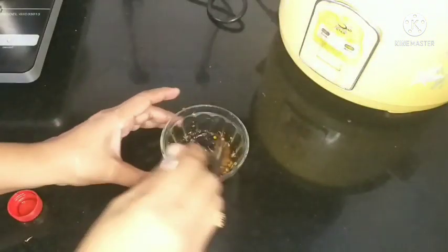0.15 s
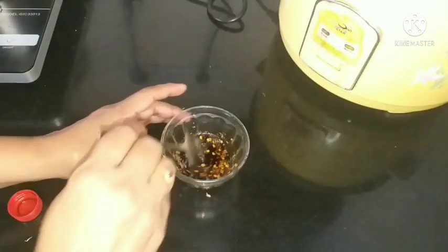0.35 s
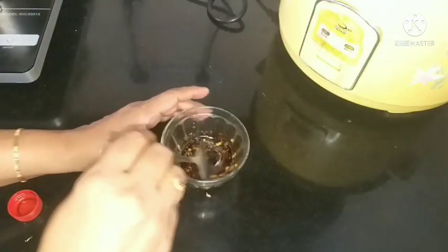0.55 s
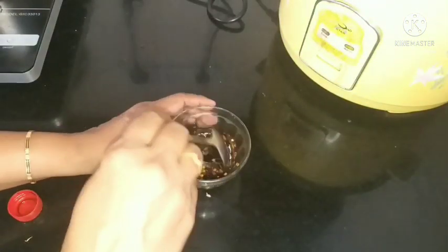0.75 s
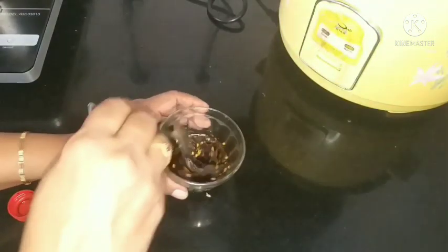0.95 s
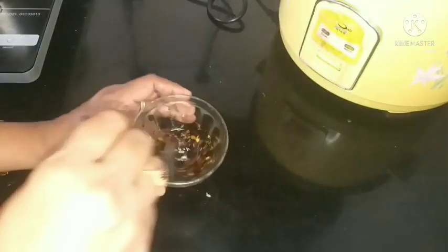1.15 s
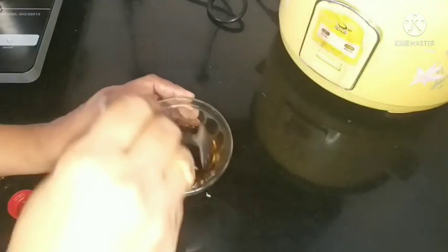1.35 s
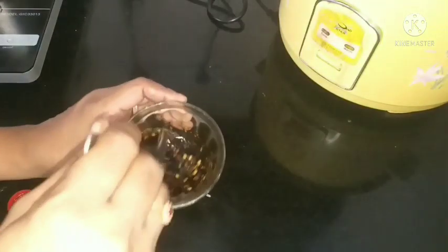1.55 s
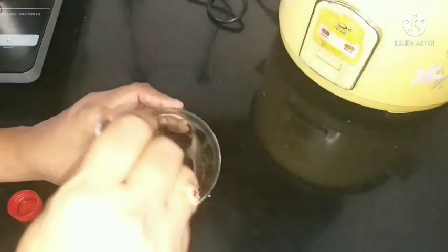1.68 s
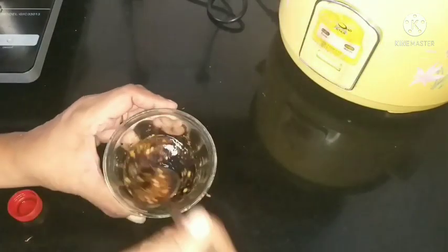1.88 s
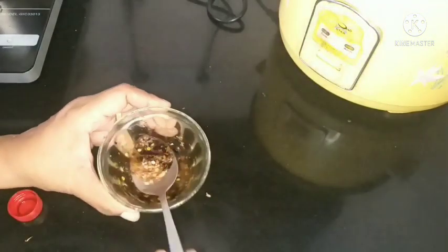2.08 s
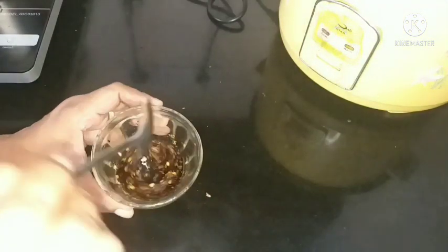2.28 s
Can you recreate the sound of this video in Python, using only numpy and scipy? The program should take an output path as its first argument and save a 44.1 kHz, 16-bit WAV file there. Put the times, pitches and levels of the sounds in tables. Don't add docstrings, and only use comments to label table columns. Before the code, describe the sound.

A metal spoon stirs runny sauce in a small glass bowl, close to a phone in a hard kitchen with low hum. Light scrapes and ticks lead to a loud ringing clink at 0.23 s, a knock at 0.36 and a softer clink at 0.59. Scrapes and damped knocks follow, strongest at 1.25; a swipe at 1.75, then hard clinks at 1.87 and 2.02, fading into quiet.

```python
import sys
import numpy as np
from scipy import signal
from scipy.fft import rfft, irfft, next_fast_len
from scipy.io import wavfile
from scipy.ndimage import uniform_filter1d, map_coordinates

SR = 44100
rng = np.random.default_rng(int(sys.argv[2]) if len(sys.argv) > 2 else 0)


def file_out(sig):
    cols = np.atleast_2d(sig).T
    lim = np.clip(cols, -1, 1)
    pcm = np.round(lim * 32767).astype(np.int16)
    wavfile.write(sys.argv[1], SR, pcm)


def volts_from_decibels(level):
    exponent = np.asarray(level, float) / 20
    return 10 ** exponent


N = 103635
LOWEST_HZ = 835


def unit(x):
    return x / np.sqrt(np.mean(x ** 2) + 1e-20)


def along(points, hz):
    f, v = np.transpose(points)
    return np.interp(np.log(hz + 1), np.log(f + 1), v)


def wobble(rate_hz, size=N):
    knots = rng.standard_normal(int(size * rate_hz / SR) + 4)
    return map_coordinates(knots, [np.arange(size) * rate_hz / SR])


def filtered(x, response):
    m = next_fast_len(x.shape[-1] + 8192)
    spectrum = rfft(x, m) * response(np.fft.rfftfreq(m, 1 / SR))
    return irfft(spectrum, m)[..., :x.shape[-1]]


def shaped(x, points):
    return filtered(x, lambda f: volts_from_decibels(along(points, f)))


def above(low_hz):
    return lambda f: (-f * f / (low_hz ** 2 - f * f + 1.3j * f * low_hz)) ** 3


def resonances(peaks):
    def response(f):
        total = 0
        for k, (centre_hz, width_hz, db) in enumerate(peaks):
            damping = 1j * f * width_hz
            total = total + (-1) ** k * volts_from_decibels(db) * damping / (centre_hz * centre_hz - f * f + damping)
        return total
    return response


def ring(modes, lift_db, longer, t, slosh_db=0):
    hz, db, t60_s = np.transpose(modes)[:, :, None]
    shake = 0
    if slosh_db:
        shake = np.array([wobble(70, size=len(t)) for _ in hz])
    decay_db = 60 * t / np.clip(t60_s * longer, .01, .6)
    level_db = db + lift_db[:, None] + slosh_db * shake - decay_db
    x = (volts_from_decibels(level_db) * np.sin(2 * np.pi * hz * t)).sum(0)
    return x / abs(x).max()


# frequency in Hz, level in dB per Hz.
HUM_SPECTRUM = [(24, -48.5), (40, -11), (209, -5), (363, -7), (751, -12.5), (1180, -17), (4000, -39.5),
                (16000, -51)]


def hum():
    level_db = -51 + 0.73 * wobble(6.85)
    return volts_from_decibels(level_db) * unit(shaped(rng.standard_normal(N), HUM_SPECTRUM))


# frequency in Hz, t60 in seconds.
KITCHEN_T60 = [(500, 0.48), (2000, 0.37), (6000, 0.33), (12000, 0.29)]


def kitchen(x):
    room_db, delay_s = -8, 0.0054
    hz, t, z = signal.stft(rng.standard_normal(SR // 2), SR, nperseg=256)
    fade = volts_from_decibels(-60 * t / along(KITCHEN_T60, hz)[:, None])
    tail = signal.istft(z * fade, SR, nperseg=256)[1]
    tail = np.pad(tail / np.linalg.norm(tail), (round(delay_s * SR), 0))
    return x + volts_from_decibels(room_db) * signal.fftconvolve(x, tail)[:len(x)]


# centre in Hz, width in Hz, level in dB.
RASP_PEAKS = [(1080, 400, -9.5), (1740, 34, 7), (2480, 360, -13.5), (2770, 49, -3.5), (2950, 48, -23),
              (3550, 45, -0.5), (4260, 91, -15.5), (4630, 150, -12), (5330, 90, -22.5), (6170, 30, -13),
              (7360, 100, -8.5), (9460, 430, -22), (10300, 110, -16), (13800, 300, -24)]


def rasp(grit):
    drift_share, flicker_db, shifts_per_s = .008, 5, 14
    hz, t, z = signal.stft(grit, SR, nperseg=1024)
    knots = rng.standard_normal((2, len(RASP_PEAKS), int(N / SR * shifts_per_s) + 2))
    drift, flicker = [[np.interp(t * shifts_per_s, np.arange(len(k)), k) for k in rows] for rows in knots]
    peaks = []
    for (centre_hz, width_hz, db), d, g in zip(RASP_PEAKS, drift, flicker):
        peaks.append((centre_hz * (1 + drift_share * d), width_hz, db + flicker_db * g))
    return signal.istft(z * resonances(peaks)(hz[:, None]), SR, nperseg=1024)[1][:N]


# frequency in Hz, level in dB per Hz.
BED_SPECTRUM = [(410, -53), (700, -27.5), (1700, 22.5), (2200, 2.5), (2770, 13), (8210, -25.5),
                (13900, -33.5), (16000, -43)]
# centre in Hz, width in Hz, level in dB.
BOTTOM_PEAKS = [(932, 19, 5.5), (1068, 52, 4)]
# time in seconds, pressure in dB, brightness in dB per octave,
# share of the bottom modes in dB.
BOTTOM_STROKES = [(.06, -79, 1, -12), (.097, -51.5, 5, 9), (0.124, -65.5, 6.5, 7), (.19, -53.5, 5, 9.5),
                  (.39, -56, -5, -6.5), (.5, -44, 2, 6.5), (.55, -55.5, -1, 5), (.58, -54.5, -11, -10),
                  (.79, -48.5, 0.5, -1.5), (.86, -44.5, -7.5, 0), (.93, -39, 2, -22), (1.03, -67, -0.5, -6),
                  (1.085, -41, 3, -20), (1.14, -65, -3, -23), (1.328, -45, 1.5, -14.5), (1.45, -50, 5.5, 1),
                  (1.541, -46.5, 2.5, 6), (1.63, -73.5, -7.5, -7.5)]
WALL_SWIPE = [
    (1.715, -80, 5.2, -13),
    (1.733, -41.5, 1.6, -22),
    (1.765, -39, 1.7, -21),
    (1.8, -50, 2.4, -19),
    (1.87, -72.5, 3.8, -23.5),
]


def scrape(strokes, low_hz):
    grit_per_s, grit_db, bed_db, fizz_db, fizz_hz = 3200, 0.5, 2, -13, 4500
    patchy_db, judder_db, judder_hz = 3, 1.8, 39.95
    s, pressure_db, tilt_db, bottom_db = np.transpose(strokes)
    time_s = np.arange(N) / SR

    grains = (rng.random(N) < grit_per_s / SR) * rng.standard_normal(N)
    grains = grains * volts_from_decibels(grit_db * rng.exponential(size=N))
    grit = unit(grains) + rng.standard_normal(N)

    tone = unit(rasp(grit))
    tone = tone + volts_from_decibels(fizz_db) * unit(filtered(grit, above(fizz_hz)))
    tone = tone + volts_from_decibels(bed_db) * unit(shaped(grit, BED_SPECTRUM))
    bottom = unit(filtered(grit, resonances(BOTTOM_PEAKS)))
    tone = tone + volts_from_decibels(np.interp(time_s, s, bottom_db)) * bottom

    hz, t, z = signal.stft(filtered(tone, above(low_hz)), SR, nperseg=512)
    patches = uniform_filter1d(uniform_filter1d(rng.standard_normal(z.shape), 5, 0), 8, 1)
    bright_db = np.outer(np.log2((hz + 300) / 3000), np.interp(t, s, tilt_db))
    z = z * volts_from_decibels(patchy_db * unit(patches) + bright_db)
    tone = signal.istft(z, SR, nperseg=512)[1][:N]
    level_db = np.interp(time_s, s, pressure_db) + judder_db * wobble(judder_hz)
    return kitchen(tone * volts_from_decibels(level_db))


# middle in seconds, peak in dB, pitch in Hz, length in seconds.
SLIP_EVENTS = [(0.099, -45, 1740, .04), (0.097, -46.5, 2730, 0.023), (0.099, -44.5, 3596, 0.025),
               (0.186, -36.5, 1030, 0.034), (0.174, -36, 3460, .025), (.175, -56, 11900, .02),
               (1.4693, -25, 4050, 0.0085), (0.504, -42, 2950, 0.028), (0.78, -33, 2950, 0.021),
               (0.938, -37, 2600, .035), (1.072, -36.5, 2750, 0.03), (1.388, -62, 10300, .06),
               (1.519, -45.5, 11000, 0.049), (1.751, -48.5, 2950, 0.041), (1.751, -49, 5560, 0.035),
               (2.348, -61, 10500, 0.013)]


def slips():
    width_share, rise_share = .035, .012
    out, t = np.zeros(N), np.arange(N) / SR
    for s, db, hz, length_s in SLIP_EVENTS:
        u = np.clip((t - s) / length_s, -3, 3)
        phase = 2 * np.pi * np.cumsum(hz * (1 + rise_share * u)) / SR
        band = wobble(width_share * hz) * np.cos(phase)
        band = band + wobble(width_share * hz) * np.sin(phase)
        out += volts_from_decibels(db) * np.exp(-4 * u ** 2) * band
    return kitchen(out)


# frequency in Hz, level in dB, t60 in seconds.
SPOON_MODES = [(946, -10.5, 0.035), (1096, -4.5, 0.034), (1500, -6.5, 0.037), (1751, -3, 0.085),
               (2423, -11, 0.02), (2750, 0, 0.027), (2950, -8.5, 0.046), (3450, -5.5, 0.079),
               (4032, 12, 0.015), (4580, -3.5, 0.027), (5390, 5, 0.014), (5940, 3, 0.0083),
               (7240, -0.5, 0.018), (10300, -8.5, 0.09)]
# frequency in Hz, level in dB per Hz.
CRACK_SPECTRUM = [(700, -1), (1500, -1.5), (3000, 0.5), (6000, -2.5), (8500, -11.5), (11000, -6),
                  (15500, -16), (17000, -33.5)]
# start in seconds, peak in dB, loudest frequency in Hz,
# brightness in dB per octave, chatter length in seconds.
WALL_KNOCKS = [(.1666, -29, 3450, 13, 0.0044), (0.172, -27, 3450, 1, 0.0086),
               (.18, -24, 2600, -1.5, 0.0068), (0.192, -24.5, 2600, 0, 0.0074), (.229, -3, 3330, 3, 0.002),
               (0.2322, -4.5, 3700, -3, 0.013), (0.352, -30, 2480, 5, 0.0071),
               (.360, -7.5, 2700, -5, 0.013), (0.592, -10.5, 1980, -9.5, 0.024),
               (0.7613, -17.5, 2600, -4.5, 0.012), (0.883, -14.5, 1730, -4.5, 0.0058),
               (0.888, -12.5, 2560, -8, 0.0051), (0.895, -21, 2300, -6.5, .005),
               (.94, -33, 1600, -6.5, 0.0061), (0.915, -45, 1630, -4, 0.026),
               (0.99, -27, 2500, -3.5, 0.0042), (1.056, -23, 2780, -4, 0.024), (1.153, -15, 6100, 1, 0.024),
               (1.25, -5, 2700, -3.5, 0.0048), (1.255, -16.5, 4400, -1.5, 0.012),
               (1.321, -25, 2900, -4, .006), (1.397, -27.5, 4600, 1.5, 0.012),
               (1.465, -22.5, 1700, -8, 0.0056), (1.467, -22, 6080, 2, 0.011),
               (1.4952, -16, 5420, -1.5, 0.0072), (1.733, -37.5, 3500, -4, 0.0092),
               (1.755, -31.5, 4300, -0.5, 0.0048), (1.83, -18, 1500, -0.5, 0.012),
               (1.8743, -7, 1500, -5, 0.013), (1.878, -9.5, 1104, -1.5, 0.028),
               (1.889, -11, 3000, -0.5, 0.015), (1.896, -12, 1700, -1.5, 0.018),
               (2.019, -6, 4640, 5.5, 0.0045), (2.023, -8, 4160, 5.5, 0.015), (2.04, -19, 4180, 1.5, 0.016),
               (0.759, -19.5, 1000, -9, .012), (.417, -37, 13500, 5, .008)]


def knocks():
    crack_t60_s, crack_db, scatter_db = 0.0053, 2.5, 1
    chatter_per_s, chatter_db, focus_db, focus_octaves = 2600, -9, 5, .45
    out, t = np.zeros(N + SR), np.arange(SR // 2) / SR
    for s, db, focus_hz, tilt_db, length_s in WALL_KNOCKS:
        def colour_db(f):
            octaves_off = np.log2((f + 1) / focus_hz)
            focus = focus_db * np.exp(-(octaves_off / focus_octaves) ** 2)
            return tilt_db * np.log2((f + 1) / 3000) + focus

        def crack_response(f):
            return volts_from_decibels(along(CRACK_SPECTRUM, f) + colour_db(np.maximum(f, LOWEST_HZ)))

        puff = rng.standard_normal(len(t))
        crack = volts_from_decibels(-60 * t / crack_t60_s) * filtered(puff, crack_response)
        lift_db = colour_db(np.transpose(SPOON_MODES)[0])
        lift_db = lift_db + scatter_db * rng.standard_normal(len(SPOON_MODES))
        contact = ring(SPOON_MODES, lift_db, 0.91, t) + volts_from_decibels(crack_db) * crack / abs(crack).max()

        fade = 1 / (1 + (t / np.clip(length_s, .002, .1)) ** 4)
        chance, strength = rng.random((2, len(t)))
        hits = (chance < chatter_per_s / SR) * (2 * strength - 1)
        train = hits * volts_from_decibels(chatter_db) * fade
        train[0] = 1
        blow = signal.fftconvolve(train, contact)[:len(t)]
        out[round(s * SR):][:len(t)] += volts_from_decibels(db - 1.5) * kitchen(blow)
    return filtered(out[:N], above(LOWEST_HZ))


RIM_MODE_HZ = [1752, 4148, 7334, 11268, 13720, 7322, 11255, 4143]
HELD_MODE_HZ = [1776, 4081, 3418, 5787, 7009, 7300, 10280, 13860]
TILTED_MODE_HZ = [3741, 3833, 4113, 5324, 7311, 7445, 8113, 9625, 11260, 11990]
# level in dB, t60 in seconds.
RIM_MODES = [(-1.5, 0.36), (-9, 0.32), (6, 0.045), (-3, 0.068), (-26, .05), (-12, 0.23), (-21, 0.18),
             (-10.5, .4)]
HELD_MODES = [(-13, 0.16), (-1, 0.067), (-10, 0.1), (-22, 0.046), (-16, 0.051), (-0.5, 0.062), (-11, 0.046),
              (-23.5, .05)]
TILTED_MODES = [(-2, 0.11), (0, 0.24), (-1.5, 0.16), (-10.5, .08), (1.5, .17), (-1.5, .15), (-15, 0.1),
                (-12, .09), (-7, 0.15), (-22, .08)]
# start in seconds, peak in dB, brightness in dB per octave,
# ring length factor, extra level of the second mode in dB.
FREE_CLINKS = [
    (.229, -2.5, 2, 1.43, 7),
    (.589, -6.5, 0.5, 0.88, 14),
]
LEANING_CLINKS = [
    (0.881, -22, 0, 0.94, 3.5),
    (1.154, -12.5, 0, 1, 2.5),
    (1.161, -16.5, 2.9, 0.63, 2),
    (1.4665, -25, 0, 0.96, -5),
]
TILTED_CLINKS = [
    (1.874, -25, -1.8, 1, 0.14),
    (2.019, -2.5, -1.1, 0.5, 0.0011),
    (2.041, -9.5, -0.64, 0.31, 2),
]


def clinks():
    swell_s, slosh_db, tilted_slosh_db = 0.0008, 1.2, 6
    out, t = np.zeros(N + SR), np.arange(SR // 2) / SR
    states = ((FREE_CLINKS, RIM_MODE_HZ, RIM_MODES, slosh_db),
              (LEANING_CLINKS, HELD_MODE_HZ, HELD_MODES, tilted_slosh_db),
              (TILTED_CLINKS, TILTED_MODE_HZ, TILTED_MODES, tilted_slosh_db))
    for rows, hz, modes, shake_db in states:
        for s, db, tilt_db, longer, second_db in rows:
            lift_db = tilt_db * np.log2(np.array(hz) / 3000)
            lift_db[1] += second_db
            x = ring(np.c_[hz, modes], lift_db, longer, t, shake_db)
            x = x * (1 - np.exp(-t / swell_s))
            out[round(s * SR):][:len(t)] += volts_from_decibels(db) * kitchen(x)
    return out[:N]


def scene():
    mic_low_hz, swipe_low_hz = 46, 2850
    stirring = scrape(BOTTOM_STROKES, LOWEST_HZ) + scrape(WALL_SWIPE, swipe_low_hz) + slips()
    strikes = clinks() + knocks()
    room = filtered(hum(), above(mic_low_hz))
    return np.tile(strikes + stirring + room, (2, 1))


def top_cut(x):
    return signal.sosfilt(signal.butter(12, 16810, fs=SR, output="sos"), x)


# centre in Hz, width in Hz, level in dB, phase in radians.
PORT_BANDS = [(1944, 710, -14.5, .8), (9500, 1500, -13.5, 2.1), (5000, 1500, -25.5, 1.5),
              (13500, 2000, -37, 2)]


def record(dry):
    ceiling, edge_hz, edge_db, top_hz = 1.3, 15500, -30, 16800

    def port_response(f):
        return sum(volts_from_decibels(db) * np.exp(1j * turn - ((f - centre_hz) / width_hz) ** 2)
                   for centre_hz, width_hz, db, turn in PORT_BANDS)

    side = filtered(dry[0], port_response)
    pair = dry + [side, -side]
    pair = pair / (1 + abs(pair / ceiling) ** 4) ** (1 / 4)
    pair = filtered(pair, lambda f: (f < top_hz) * volts_from_decibels(edge_db * (f > edge_hz)))
    return top_cut(pair)


dry = scene()
out = record(dry)
file_out(out)
```